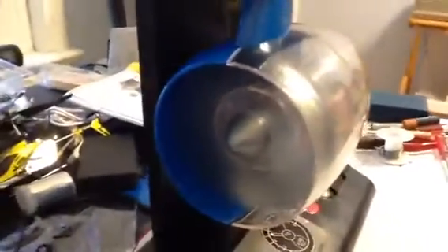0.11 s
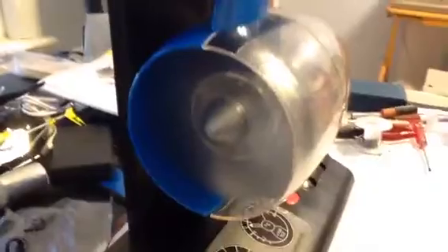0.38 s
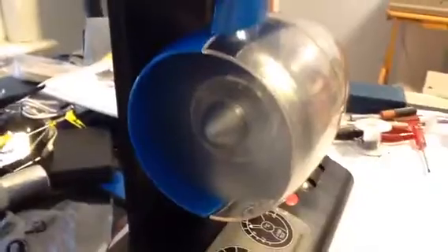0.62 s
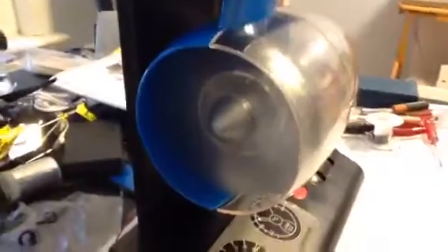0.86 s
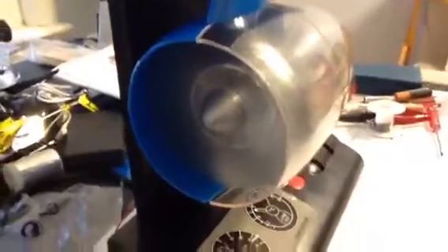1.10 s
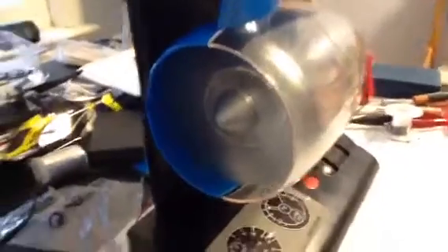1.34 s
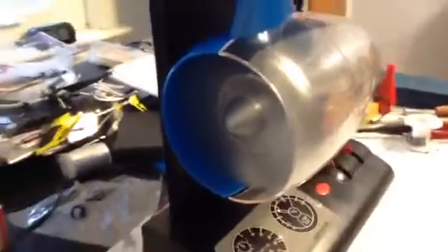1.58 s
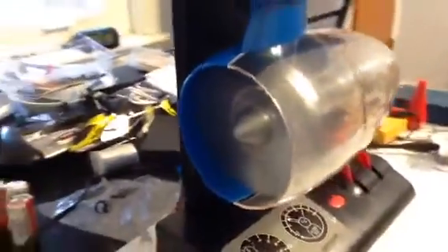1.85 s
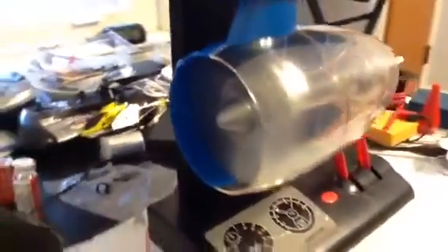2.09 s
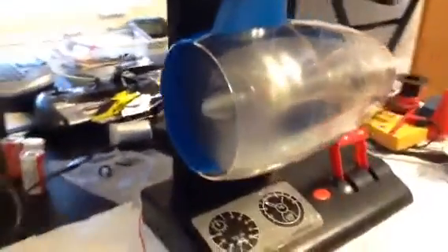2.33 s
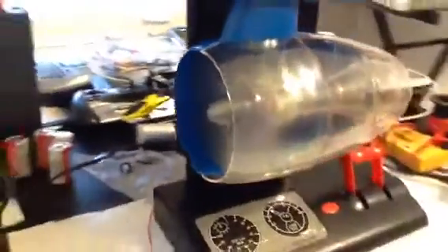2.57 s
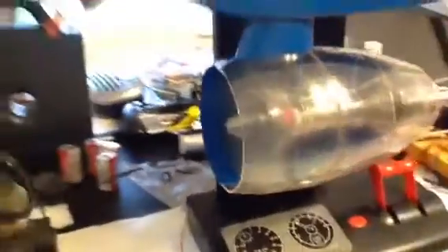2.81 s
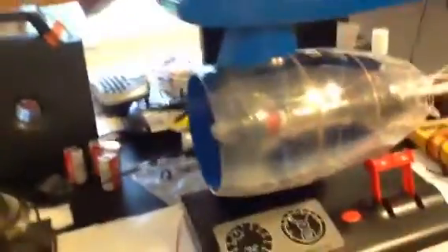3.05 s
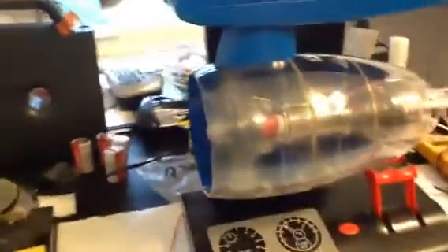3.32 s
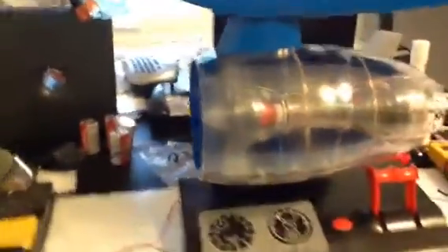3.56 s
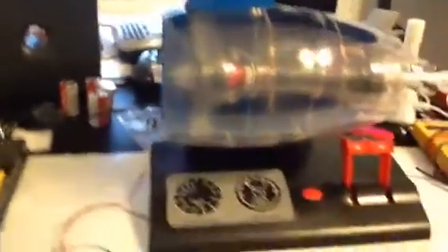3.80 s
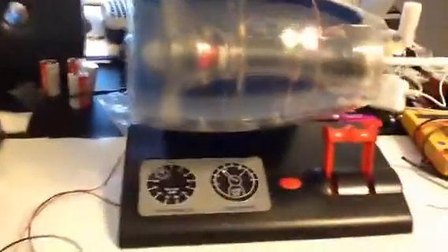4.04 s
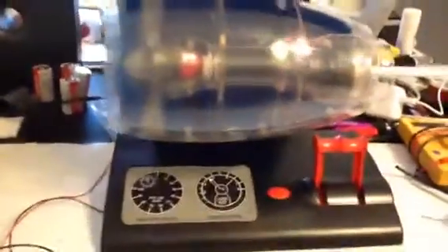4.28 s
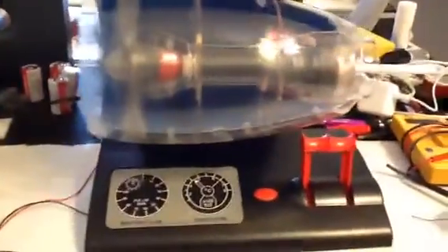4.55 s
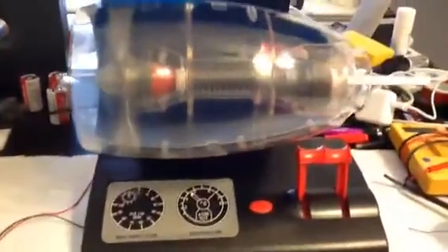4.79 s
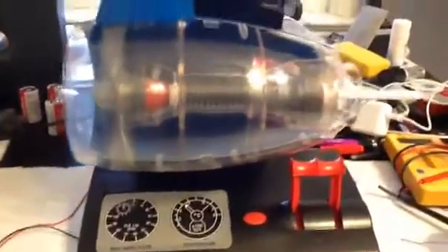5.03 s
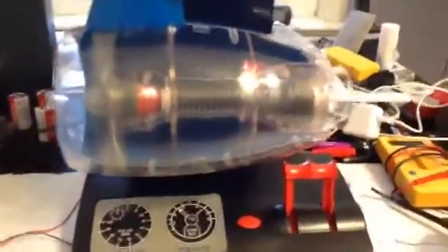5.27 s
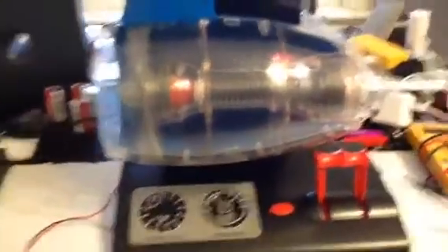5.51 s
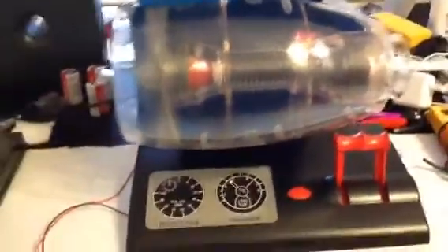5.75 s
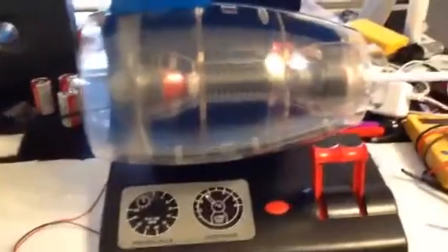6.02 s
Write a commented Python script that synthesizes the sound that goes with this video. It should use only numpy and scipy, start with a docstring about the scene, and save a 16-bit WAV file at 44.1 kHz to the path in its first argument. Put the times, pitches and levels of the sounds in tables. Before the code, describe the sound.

A plastic model jet engine runs at full speed on a desk, driven by a small electric motor. A shrill, nearly steady whine sits over a cluster of wavering hums and a broad rush of air and bearings. The close hand-held mono microphone moves from intake to flank, so tones fade in and out, and faint shell buzzes appear later.

```python
"""On a desk, a small electric motor spins the fan and turbine of a plastic model jet engine at full speed.
A fast shaft whines as sines at its blade orders; a slower shaft adds side tones that waver.
Air and bearings rush as noise filtered by the shell, whose loose panels buzz now and then as tones.
A hand-held mono microphone swings from the intake round to the flank, so each tone fades in and out."""
import sys
import numpy as np
from scipy import signal
from scipy.io import wavfile
from scipy.ndimage import uniform_filter1d

SR = 44100
rng = np.random.default_rng(int(sys.argv[2]) if len(sys.argv) > 2 else 0)


def gain_from_db(level_db):
    """Convert decibel levels to linear amplitude factors (20 dB per decade)."""
    decades = np.asarray(level_db, float) / 20
    return 10 ** decades


def dump_mix(stems):
    """Bounce the given channels to the path in sys.argv[1] as a 16-bit WAV at rate SR."""
    frames = np.atleast_2d(stems).T  # one column per channel
    limited = np.clip(frames, -1, 1)  # hard clip at full scale
    pcm = np.round(limited * 32767).astype(np.int16)
    wavfile.write(sys.argv[1], SR, pcm)


N = 270333  # samples
SLOW_PER_FAST = 5 / 21  # turns of the slow shaft per turn of the fast one

# Rotation of the fast shaft, which hunts a little: time_s, speed_turns_per_s
SHAFT_SPEED = [(0, 470.4), (.28, 475.2), (.52, 470.4), (.65, 472.2), (.95, 472.2), (1.17, 474.4),
               (1.45, 471.2), (2.0, 472), (2.35, 472), (2.45, 470.8), (2.8, 471.4), (3.15, 467.6),
               (3.35, 466.4), (3.7, 468.8), (3.85, 472.4), (4.07, 470.8), (4.18, 473.4), (4.44, 474.2),
               (4.7, 471.6), (4.78, 474.4), (4.84, 473.2), (4.91, 475.8), (5.1, 475), (5.26, 473),
               (5.45, 474.5), (5.8, 471.8), (6.13, 472.8)]
# Path of the microphone and level of the rush: time_s, level_db, turn (0 intake - 1 flank)
MICROPHONE_PATH = [(0, -19, 0.024), (1.2, -19, 0.046), (2.1, -18.5, 0.2), (2.9, -19.5, .48),
                   (3.7, -19.5, 0.76), (4.5, -20, 0.9), (6.13, -20, .98)]
# Blade tone, order 8 of the fast shaft: time_s, level_db (rms)
BLADE_LEVEL = [(0.0, -18.5), (0.22, -17.5), (0.29, -27), (0.48, -15.5), (0.9, -16), (1.41, -20.5),
               (1.48, -14), (1.59, -20), (2.0, -20), (2.05, -27), (2.13, -28), (2.2, -15.5), (2.34, -15.5),
               (2.68, -16.5), (2.82, -28), (2.87, -19), (2.92, -24), (2.97, -18), (3.16, -42), (3.19, -21),
               (3.28, -36), (3.33, -24), (3.6, -25.5), (3.64, -36), (3.81, -14.5), (3.89, -17.5),
               (3.96, -36), (3.99, -25), (4.08, -31), (4.15, -13.5), (4.64, -16), (5.05, -14.5),
               (5.27, -19.5), (5.38, -14), (5.68, -19.5), (6.13, -22)]
# Neighbour of the blade tone, order 9: time_s, level_db (rms)
NEIGHBOUR_LEVEL = [(0.0, -30.5), (0.34, -21.5), (0.51, -25.5), (1.28, -21), (1.53, -39), (1.57, -25),
                   (1.6, -32), (1.91, -25.5), (2.06, -21), (2.63, -35), (2.82, -26), (3.21, -36),
                   (3.3, -25), (3.33, -31.5), (3.76, -28.5), (3.89, -39), (4.35, -29), (6.13, -34)]
# High whistles: fast_order, slow_order, then level_db (rms) in five even directions, intake to flank
WHISTLE_TONES = [(16, 0, -42, -36.5, -37, -34.5, -42), (24, 0, -37, -38.5, -42, -44.5, -40.5),
                 (24, -1, -37, -37.5, -43.5, -39.5, -41)]
# Shaft tones: fast_order (rounded to whole turns in use), slow_order (rounded to half turns),
# then level_db (rms) in five even directions, intake to flank
SHAFT_TONES = [(0, 1, -59.5, -59, -60, -63, -69), (0, 2.5, -53.5, -50, -50.5, -55, -57.5),
               (1, -1, -38.5, -38.5, -41, -39, -40.5), (1, 0, -33, -32.5, -35, -39.5, -33),
               (1, 1, -46, -37.5, -43, -34, -42), (2, -2.5, -46, -65, -51, -44, -42),
               (2, -1, -33, -36.5, -38, -28.5, -37), (2, 0, -31.5, -45, -31.5, -34.5, -45),
               (2, 1, -49, -48, -33.5, -44, -35), (3.5, -2.5, -59, -53, -52, -48, -36),
               (2, 2, -41, -41, -37, -34, -40.5), (3, -1, -38, -40.5, -50, -42, -35),
               (3, 0, -35, -32, -43, -34, -46), (4, -1, -34, -30.5, -39, -32, -40),
               (4, 0, -30, -36, -35.5, -42, -34), (5.5, -0.5, -56, -53, -51, -35, -38),
               (5, 0, -51, -35, -32, -37.5, -38), (5.5, 1, -36, -40, -38.5, -36.5, -41),
               (6, -1, -36.5, -34.5, -38, -34, -33), (7, 0, -37, -35, -43, -46, -34)]
# Relative spectral density of the rush at the intake: frequency_hz, density_db
INTAKE_SPECTRUM = [(100, -30), (140, -24), (185, -31), (270, -14), (320, -16), (420, -9.5), (630, -10.5),
                   (1480, -1.5), (2050, -5), (3500, -2.5), (5500, 0.5), (9500, -15), (12300, -15),
                   (14300, -24.5)]
# Relative spectral density of the rush at the flank: frequency_hz, density_db
FLANK_SPECTRUM = [(100, -35), (140, -22.5), (185, -23.5), (270, -19.5), (320, -16), (420, -16), (630, -3.5),
                  (1480, -5.5), (2050, -3), (3500, -1.5), (5500, 0), (9500, -13), (12300, -14.5),
                  (14300, -23.5)]
# Resonances of shell and stand rung by the rush: frequency_hz, width_hz,
# then level_db over the rush in four even directions, intake to flank
SHELL_MODES = [(130, 23, 8, 6.3, 5, 4.5), (221, 51, 9, 9.9, 9.5, 7), (247, 63, 8, 2.3, -1, -5),
               (566.4, 15.4, 14, 6.8, 15, 13), (685, 18, 10, 6.3, 12, 3), (697, 29, 7.5, 16, 5, -4),
               (740, 33, 2, 2.2, 9, -1), (1162, 165, -6, 5.3, 4, 7.5), (1664, 113, 3, 1, 0, 10),
               (2614, 240, 5, 8.2, 7, 8), (3182, 45, 7, 9, 3, 0), (4250, 450, 4, 1.5, -5, 2.5),
               (5060, 240, -2, 5, -12, -33), (5730, 100, 0, 3, -5, 7), (6010, 135, 3.5, 7.7, 6, -2)]
# Brief buzzes of the shell: centre_s, length_s, level_db
BUZZ_TIMES = [(3.55, .2, -38.5), (3.904, .14, -33.5), (4.42, 0.11, -32.5), (4.657, .08, -35),
              (4.857, .2, -30), (5.507, .2, -35.5), (6.088, 0.073, -31)]
# Tones of the buzzing panels: pitch_hz, relative level_db
PANEL_MODES = [(572, -4), (670, -2), (1140, -1)]


def along(points, hz):
    """Logarithmic frequency scale: a spectrum is interpolated evenly in log frequency."""
    point_hz, value = np.transpose(points)
    return np.interp(np.log(hz + 1), np.log(point_hz + 1), value)


def curves(rows):
    """Linear interpolation: each column after the time becomes one value per sample."""
    time_s, *columns = np.transpose(rows)
    return [np.interp(np.arange(N) / SR, time_s, column) for column in columns]


def wobble(rate):
    """Slow random modulation: straight lines join Gaussian knots, rate of them a second."""
    knots = rng.standard_normal(int(N * rate / SR) + 4)
    return np.interp(np.arange(N) * rate / SR, np.arange(len(knots)), knots)


def tone(turns, db, drift, flicker_db):
    """Phase and amplitude modulation: a sine of rms db drifts in phase (radians) and flickers in level."""
    phase = 2 * np.pi * (turns + rng.random()) + drift * wobble(40)
    level = gain_from_db(db + flicker_db * wobble(25))
    return np.sqrt(2) * level * np.sin(phase)


def towards(levels, turn):
    """Directivity: levels at even directions are read along the microphone's turn."""
    return np.interp(turn, np.linspace(0, 1, len(levels)), levels)


def heard(levels, turn, order):
    """Directivity and fading: a tone fades by itself as the hand drifts, long waves less."""
    fade_db, fade_knots_per_s, full_fade_order = 1.7, 1.61, 3
    fading = fade_db * min(order / full_fade_order, 1)
    return towards(levels, turn) + fading * wobble(fade_knots_per_s)


def whine(turns, turn):
    """Blade-order radiation: the blade tone, its neighbour and the whistles are multiples of shaft speed."""
    blade_db = curves(BLADE_LEVEL)[0] + 0.5 * wobble(12)
    total = tone(8 * turns, blade_db, drift=0.64, flicker_db=1.5)
    neighbour_db = curves(NEIGHBOUR_LEVEL)[0] + 1.7 * wobble(12)
    total += tone(9 * turns, neighbour_db, drift=0.7, flicker_db=2.5)
    for fast, slow, *levels in WHISTLE_TONES:
        order = round(fast) + round(slow) * SLOW_PER_FAST
        level_db = heard(levels, turn, fast) + 2.2 * wobble(4.05) + 2.2 * wobble(16)
        total += tone(order * turns, level_db, drift=1.0, flicker_db=2.5)
    return total


def hum(turns, turn):
    """Sum and difference orders: low ones are clean; play in the slow shaft makes side tones waver and bead."""
    total = np.zeros(N)
    for fast, slow, *levels in SHAFT_TONES:
        order = round(fast) + round(2 * slow) / 2 * SLOW_PER_FAST
        rough = min(0.35 + 0.3 * order, 1)  # the higher the order, the more it shakes
        play_turns, beads_db = (0.22, 3.0) if round(slow) else (0.06, 1.4)
        wavering_turns = order * turns + rough * play_turns * wobble(11)
        level_db = heard(levels, turn, order) + rough * beads_db * wobble(14)
        total += tone(wavering_turns, level_db, drift=0.36 * rough, flicker_db=1.6 * rough)
    return total


def rush(turns):
    """Resonant filtering of noise: air and bearings excite the shell; colour turns with the microphone."""
    level_db, flank = curves(MICROPHONE_PATH)
    hz, frame_s, spectrum = signal.stft(rng.standard_normal(N), SR, nperseg=2048)
    turn = np.clip(np.interp(frame_s, np.arange(N) / SR, flank), 0, 1)
    colour_db = np.outer(along(INTAKE_SPECTRUM, hz), 1 - turn)
    colour_db += np.outer(along(FLANK_SPECTRUM, hz), turn)

    rings = np.zeros(spectrum.shape)  # power over the plain rush
    for mode_hz, width_hz, *levels in SHELL_MODES:
        resonance = 1 / (1 + (2 * (hz - mode_hz) / width_hz) ** 2) ** 2
        rings += np.outer(resonance, gain_from_db(towards(levels, turn)) ** 2)

    # patches of reflection drift as the hand moves
    patches = uniform_filter1d(rng.standard_normal(spectrum.shape), 10, axis=0)
    patches = uniform_filter1d(patches, 8, axis=1)
    gain = gain_from_db(colour_db + 1.65 * patches / patches.std()) * np.sqrt(1 + rings)
    noise = signal.istft(spectrum * gain, SR, nperseg=2048)[1][:N]

    # each shaft rubs once a turn
    slow_rub = 0.054 * np.sin(2 * np.pi * SLOW_PER_FAST * turns)
    fast_rub = 0.07 * np.sin(2 * np.pi * turns)
    throb = 1 + slow_rub + fast_rub
    return gain_from_db(level_db + 0.53 * wobble(35)) * throb * noise / noise.std()


def buzz():
    """Modal vibration: loose panels sing for a moment at their own pitches."""
    t = np.arange(N) / SR
    swell = np.zeros(N)
    for centre_s, length_s, level_db in BUZZ_TIMES:
        swell += gain_from_db(level_db) * np.exp(-(2 * (t - centre_s) / length_s) ** 4)
    panels = sum(tone(hz * t, db, drift=0.6, flicker_db=2.2) for hz, db in PANEL_MODES)
    return swell * panels


def scene():
    """Superposition: all sources share one pair of shafts and add at one microphone, on two equal channels."""
    speed = curves(SHAFT_SPEED)[0] + 0.35 * wobble(35) + 0.659 * wobble(18)
    turns = np.cumsum(speed) / SR  # of the fast shaft
    turn = curves(MICROPHONE_PATH)[1]
    engine = whine(turns, turn) + hum(turns, turn) + rush(turns) + buzz()
    return np.array([engine, engine])


def top_cut(x):
    """Nothing passes above the cut-off."""
    return signal.sosfilt(signal.butter(12, 15210, fs=SR, output="sos"), x)


def record(dry):
    """High-pass filtering: a steep low cut at 105 Hz acts on both channels."""
    low_cut = signal.butter(4, 105, "highpass", fs=SR, output="sos")
    mix = signal.sosfilt(low_cut, dry)
    return top_cut(mix)


dry = scene()
out = record(dry)
dump_mix(out)
```